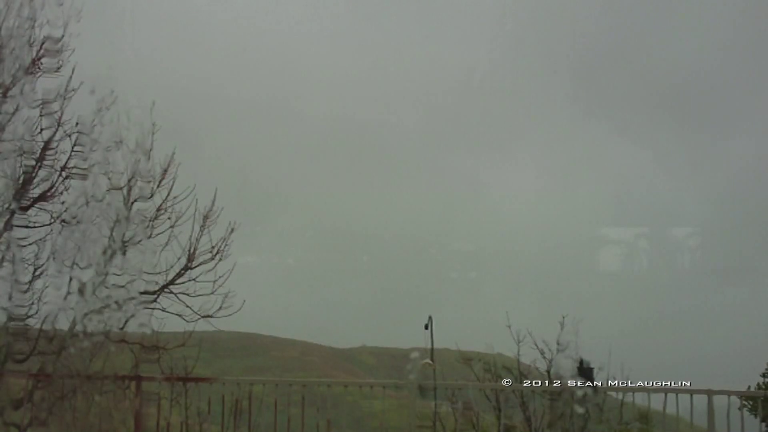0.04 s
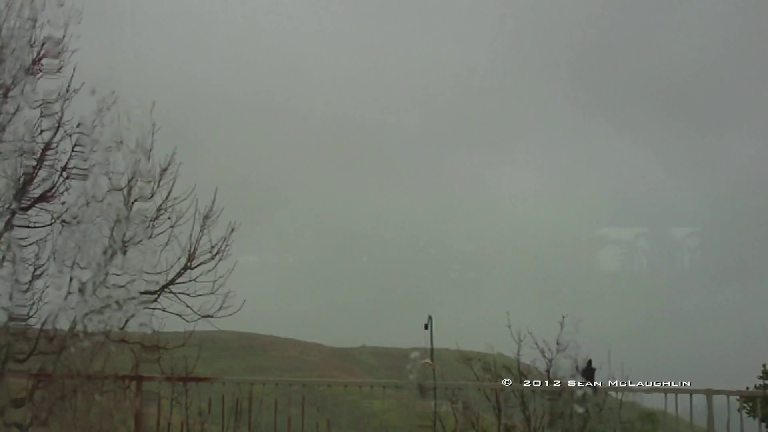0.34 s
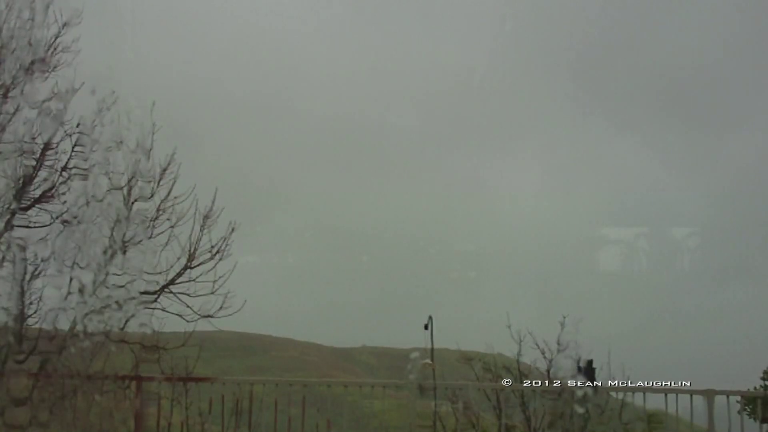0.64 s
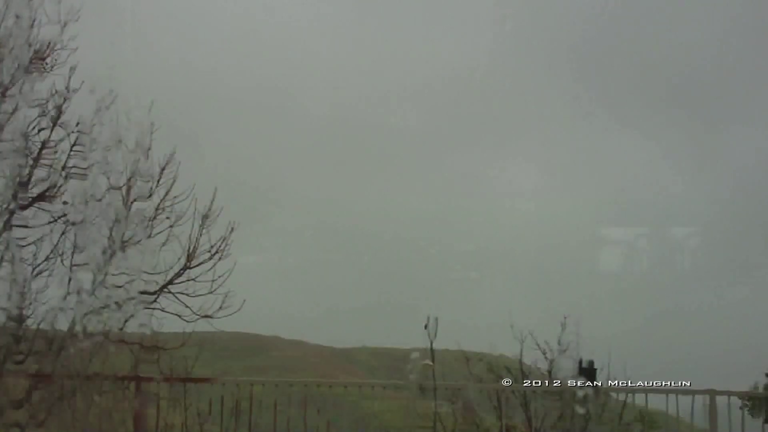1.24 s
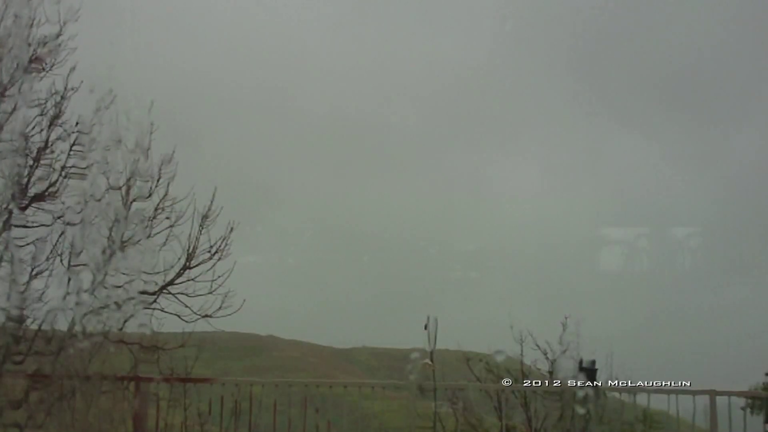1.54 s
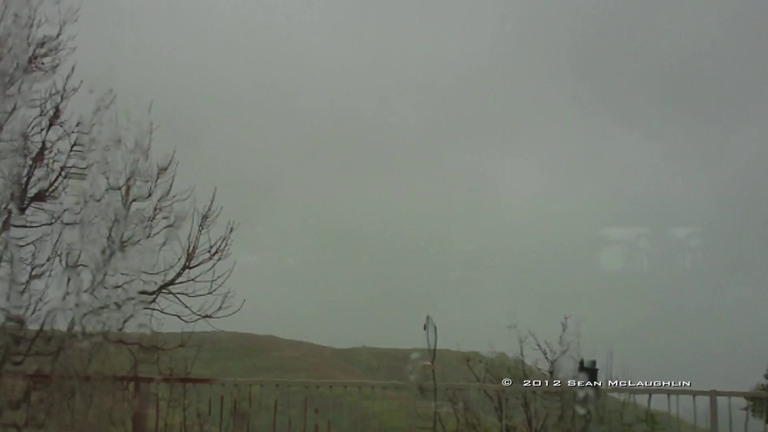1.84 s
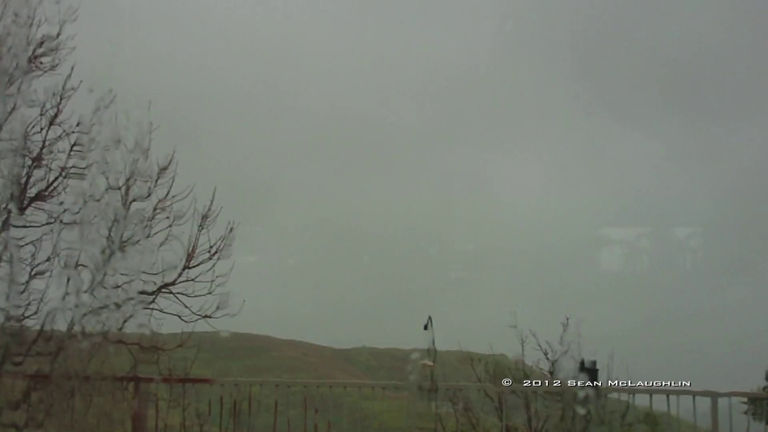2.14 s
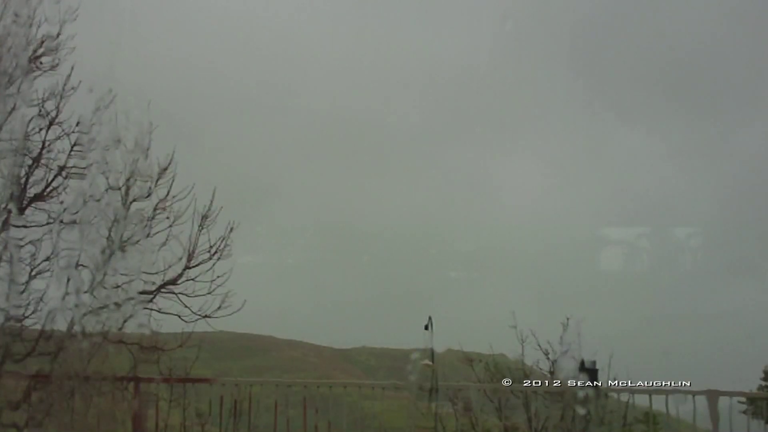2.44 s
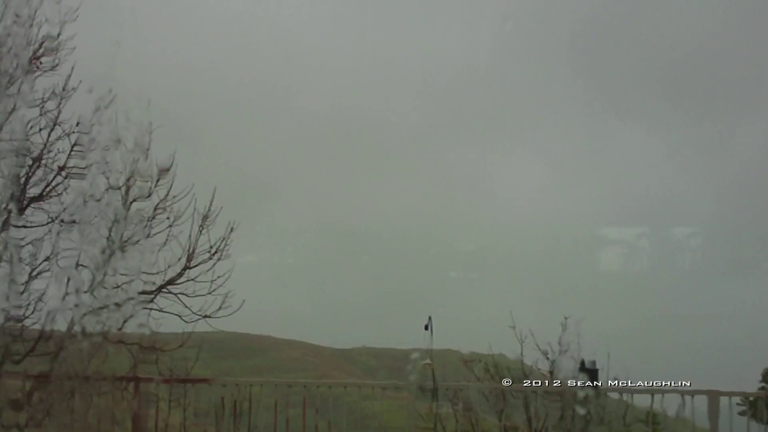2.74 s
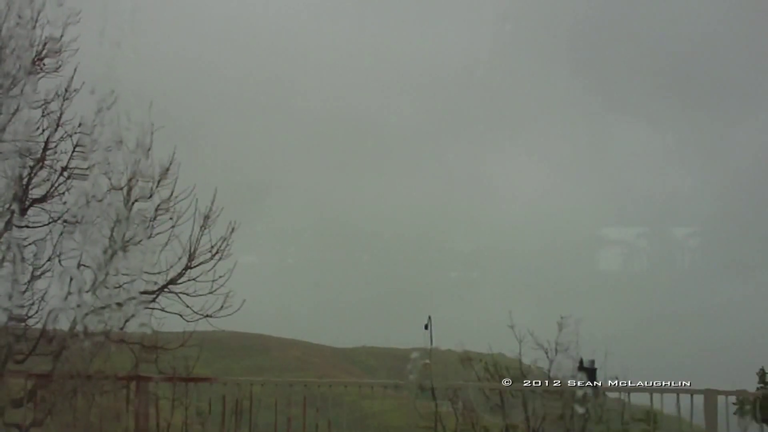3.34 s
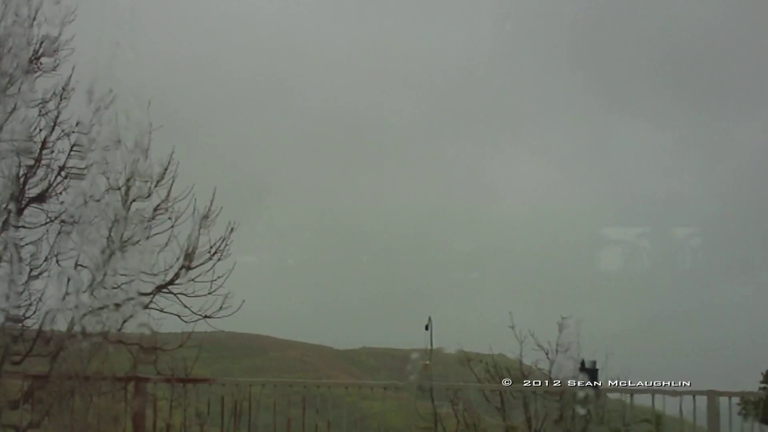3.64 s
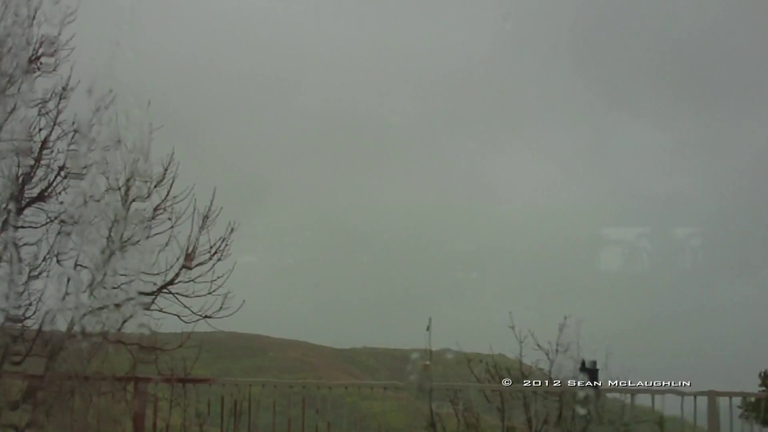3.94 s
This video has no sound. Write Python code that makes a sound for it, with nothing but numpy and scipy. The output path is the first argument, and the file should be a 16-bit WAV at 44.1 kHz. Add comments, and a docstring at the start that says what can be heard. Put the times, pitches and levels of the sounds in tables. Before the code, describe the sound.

Thunder, heard from behind a window, mutters far off for two seconds, with a dull thump at about 0.3 seconds over faint hiss. At 2 seconds a much louder peal breaks in, cracking and tearing, and booms on until the end at 4 seconds. Its surges overload the microphone with short crackles. The window rattles lightly from about 2.4 seconds and squeaks faintly around 3.4 seconds.

```python
"""Thunder, heard from behind a window: shock waves from along the lightning channel, dulled by the air.
A far roll with one dull thump mutters for two seconds, then the main peal breaks in, cracking and
tearing. Its steepest pressure fronts overload the microphone with short crackles, and the window
rattles and squeaks after the heaviest surges. Underneath lie the recorder's faint hiss and thin
whine, and early on a slight rustle and a faint whistle."""
import sys
import numpy as np
from scipy import signal
from scipy.fft import rfft, irfft
from scipy.io import wavfile
from scipy.ndimage import uniform_filter1d

SR = 44100
rng = np.random.default_rng(int(sys.argv[2]) if len(sys.argv) > 2 else 0)


def generate_wav(signal):
    """Clip the signal to [-1, 1] and save it as 16-bit WAV at the path in sys.argv[1]."""
    frames = np.transpose(np.atleast_2d(signal))
    scaled = np.clip(frames, -1, 1) * 32767
    pcm = np.round(scaled).astype(np.int16)
    wavfile.write(sys.argv[1], SR, pcm)


N = 176400
T = np.arange(N) / SR
HZ = np.maximum(np.fft.rfftfreq(N, 1 / SR), 1)

# spectrum of the near thunder: frequency_hz, gain_db
NEAR_COLOUR = [(20, -20), (30, 12.5), (39, -23), (51, 11.5), (68, -12.5), (82, 3), (97, -4), (128, 1),
               (174, -8.5), (206, -4.5), (269, -12), (345, -7), (415, -9.5), (510, -17), (820, -25.5),
               (967, -25), (1190, -33), (2500, -55)]
# steep pressure fronts that overload the microphone: start_s, crackle_db
FRONTS = [(2.0217, -41.5), (2.0405, -35.5), (2.062, -46), (2.077, -34.5), (2.0997, -32), (2.133, -34.5),
          (2.1817, -33.5), (2.2022, -38), (2.21, -40), (2.219, -34.5), (2.289, -36.5), (2.3153, -34.5),
          (2.37, -31.5), (2.405, -33.5), (2.448, -32.5), (2.6558, -32), (2.715, -33.5), (2.742, -35),
          (2.7945, -33), (2.9055, -34), (2.9261, -35), (2.9393, -34.5), (2.957, -36), (2.9685, -32.5),
          (2.9938, -34.5), (3.0096, -34.5), (3.0792, -35), (3.1228, -33), (3.161, -35), (3.1984, -36),
          (3.231, -41), (3.2517, -36), (3.3054, -36.5), (3.3225, -34.5), (3.341, -43.5), (3.4192, -38),
          (3.514, -42.5), (3.537, -33), (3.587, -36), (3.677, -35.5), (3.7073, -33.5), (3.7425, -39.5)]
FRONT_DELAY_S = 0.0018   # from the start of a crackle to the middle of its pressure swing


def from_db(db):
    """Decibels to gain."""
    return 10 ** (np.asarray(db) / 20)


def rms_one(x):
    """Scale to rms 1."""
    return x / np.sqrt(np.mean(x ** 2) + 1e-20)


def level(*curves):
    """Gain over time from (time_s, level_db) curves that follow one another."""
    s, db = np.vstack(curves).T
    return from_db(np.interp(T, s, db))


def colour(points):
    """Gain over frequency from (frequency_hz, gain_db) points."""
    hz, db = np.transpose(points)
    return from_db(np.interp(np.log(HZ), np.log(hz), db))


def tint(x, points):
    """Colour a steady noise, falling away under the first point; rms 1."""
    return rms_one(irfft(rfft(x) * colour(points) / np.sqrt(1 + (points[0][0] / HZ) ** 8), N))


def grains(per_s, spread_db):
    """Random clicks of uneven size and sign; rms 1."""
    sizes = from_db(spread_db * np.minimum(rng.exponential(1, N), 4)) * rng.choice([-1, 1], N)
    return rms_one(sizes * (rng.random(N) < per_s / SR))


def flicker(span_s):
    """A random drift that changes over the given span; rms 1."""
    return rms_one(uniform_filter1d(rng.standard_normal(N), max(int(span_s * SR), 2)))


def wavering(hz, waver_hz, span_s):
    """A tone of unsteady pitch."""
    return np.sin(2 * np.pi * np.cumsum(hz + waver_hz * flicker(span_s)) / SR)


def ring(x, hz, t60):
    """A decaying resonance driven by x."""
    r, w = from_db(-60 / (t60 * SR)), 2 * np.pi * hz / SR
    return signal.lfilter([0, np.sin(w)], [1, -2 * r * np.cos(w), r * r], x + 1e-18)


def swell(start_s, rise_s):
    """A rounded pulse that peaks one rise time after its start."""
    u = np.clip((T - start_s) / rise_s, 0, 20)
    return u ** 2 * np.exp(2 - 2 * u)


def bouts(rows, rise_s=0.0032):
    """Envelope of quick rises and slower decays from (start_s, level_db, decay_s) rows."""
    return sum(from_db(db) * np.clip((T - s) / rise_s, 0, 1) * np.exp(-np.maximum(T - s, 0) / decay)
               for s, db, decay in rows)


def arrivals(spectrum, low_hz, high_hz, per_s, spread_db, even_s):
    """One band of shock waves from along the lightning channel, its level evened out over even_s."""
    band = colour(spectrum) / np.sqrt((1 + (low_hz / HZ) ** 16) * (1 + (HZ / high_hz) ** 16))
    shocks = irfft(rfft(grains(per_s, spread_db)) * band, N)
    size = max(int(even_s * SR), 2)
    power = uniform_filter1d(uniform_filter1d(shocks ** 2, size, mode="wrap"), size, mode="wrap")
    return shocks / np.sqrt(np.abs(power) + 1e-20)


def recorder_noise():
    """The recorder's own floor: separate hiss in each channel and one thin, steady whine."""
    # spectrum of the hiss: frequency_hz, gain_db
    hiss_colour = [(1900, -7), (3000, 1.5), (4500, 1.5), (8000, -1), (15000, -2)]
    hiss = from_db(-63) * tint(rng.standard_normal((2, N)), hiss_colour)
    whine = from_db(-79.5) * rms_one(np.sin(2 * np.pi * 7860 * T))
    return hiss + whine


def rustle():
    """A faint rustle of fine ticks that fades under the far roll."""
    # the rustle's course: start_s, level_db, decay_s
    course = [(0, -60.5, 0.19)]
    # its spectrum: frequency_hz, gain_db
    spectrum = [(1200, -33), (2000, 9), (2900, 5), (3800, -10), (6000, -22)]
    return bouts(course) * tint(grains(3000, spread_db=-3.0), spectrum)


def whistle():
    """A faint, thin whistle that comes and goes, unsteady in level and pitch."""
    # the whistle's course: time_s, level_db, pitch_hz
    course = [(.38, -78, 3565), (.52, -77, 3640), (.69, -69, 3710), (.84, -73, 3610), (.95, -68, 3550),
              (1.22, -80, 3510)]
    s, db, hz = np.transpose(course)
    strength = np.interp(T, s, from_db(db), left=0, right=0) * from_db(3 * flicker(span_s=0.013))
    return strength * wavering(np.interp(T, s, hz), waver_hz=125, span_s=0.0013)


def frame_knock():
    """A quick run of light contacts makes the window frame ring."""
    # the knock: start_s, level_db, decay_s
    knocks = [(1.495, -51, 0.023)]
    # resonances of the frame: pitch_hz, gain_db, t60_s
    modes = [(2200, 1, .02), (2600, 0, 0.023), (2980, -4, .025), (3450, -9, 0.011)]
    contacts = bouts(knocks) * grains(2500, spread_db=1)
    return sum(from_db(db) * ring(contacts, hz, t60) / np.sqrt(t60 * SR / np.log(1000))
               for hz, db, t60 in modes)


def pane_squeaks():
    """The pane gives brief, high squeaks as it slips in its frame."""
    # slips of the pane: start_s, level_db, rise_s
    slips = [(3.302, -54, .013), (3.418, -46.5, 0.0026), (3.974, -55, 0.0082)]
    # partials of a squeak: pitch_hz, gain_db
    partials = [(5510, 5), (6250, -12)]
    tone = sum(from_db(db) * wavering(hz, waver_hz=230, span_s=0.00057) for hz, db in partials)
    return rms_one(tone) * sum(from_db(db) * swell(s, rise) for s, db, rise in slips)


def window_rattle():
    """Dense small contacts set the window ringing after the heavy surges."""
    # bouts of rattling: start_s, level_db, decay_s
    rattles = [(2.372, -43, 0.1), (2.468, -47, 0.036), (2.57, -52, 0.071), (3.03, -49.5, 0.16),
               (3.3, -43, 0.078), (3.445, -59.5, 0.079), (3.975, -54, 0.036)]
    # resonances of the window: pitch_hz, gain_db, t60_s
    modes = [(2390, 8, 0.0069), (3170, 6.5, 0.011), (3500, 7.5, 0.0065), (3800, -0.5, .02),
             (5160, -1, 0.0068), (5550, -6, 0.011), (5630, -5, .005), (6370, -0.5, 0.015), (6900, -5, .008)]
    ringing = sum(from_db(db) * rms_one(ring(grains(1300, spread_db=3.0), hz, t60))
                  for hz, db, t60 in modes)
    return bouts(rattles) * rms_one(ringing)


def microphone_overload():
    """Each front is a sudden swing of pressure; each channel crackles and recovers in its own way."""
    # spectrum of the crackle: frequency_hz, gain_db
    crackle_colour = [(1000, 15), (3000, 5), (5500, 5), (8000, 3), (11000, -2), (16000, -2.5)]
    # spectrum of the imbalance between left and right: frequency_hz, gain_db
    imbalance_colour = [(25, 5.5), (130, -1), (400, -8), (1000, -20), (3000, -26), (9000, -46)]
    swing_rise_s, swing_width_s, sputter_reach_s = 0.00069, 0.002, 0.015
    swings, crackle_gain, sputter_gain, imbalance_gain = np.zeros((4, N))
    for s, db in FRONTS:
        t = T - s - FRONT_DELAY_S
        swing = np.tanh(t / swing_rise_s) * np.exp(-np.minimum(abs(t) / swing_width_s, 20))
        swings += rng.choice([-1, 1]) * from_db(db + 24.5) * swing
        crackle_gain += from_db(db) * swell(s, rise_s=0.0013)
        sputter_gain += from_db(db - 19.5) * np.exp(-np.minimum((t / sputter_reach_s) ** 2, 20))
        imbalance_gain += from_db(db - 2) * swell(s, rise_s=0.0084)
    crackle = crackle_gain * tint(rng.standard_normal((2, N)), crackle_colour)
    sputter = sputter_gain * tint([grains(1500, spread_db=9.5) for _ in range(2)], crackle_colour)
    imbalance = imbalance_gain * tint(rng.standard_normal(N), imbalance_colour) * [[1], [-1]]
    return swings + crackle + sputter + imbalance


def microphone_choke():
    """Gain of the overloaded microphone, which goes briefly quieter after each front."""
    return from_db(-3 * sum(swell(s + FRONT_DELAY_S, rise_s=0.0093) for s, _ in FRONTS))


def far_thump():
    """One distant clap that arrives as a short, nearly pure boom."""
    start_s, pitch_hz = 0.249, 141
    return from_db(-14.5) * swell(start_s, rise_s=0.02) * np.sin(2 * np.pi * pitch_hz * (T - start_s))


def claps():
    """Bunches of shock waves that arrive together, each around its own pitch."""
    # claps that stand out of the roll: start_s, level_db, pitch_hz, rise_s
    bunches = [(.352, -21.5, 135, 0.039), (1.089, -29.5, 351, 0.033), (1.255, -25.5, 293, 0.014),
               (1.464, -22, 243, 0.035), (2.004, -11, 90, 0.039), (2.63, -21, 74, 0.018),
               (2.921, -14.5, 392, 0.015), (3.28, -26, 367, 0.055), (3.503, -12, 133, 0.022),
               (3.943, -18.5, 169, 0.037)]
    band_ratio = 1.46
    return sum(from_db(db) * swell(s, rise)
               * arrivals(NEAR_COLOUR, hz / band_ratio, hz * band_ratio,
                          per_s=2800, spread_db=3.5, even_s=0.068)
               for s, db, hz, rise in bunches)


def cracks():
    """Dense volleys of sharp shocks that start at once and die quickly."""
    # cracks within the main peal: start_s, level_db
    volleys = [(2.054, -24), (2.264, -32), (2.295, -26), (2.336, -25.5), (2.36, -24.5), (2.383, -34),
               (2.694, -29), (2.79, -35), (2.932, -24), (3.068, -25)]
    # their spectrum: frequency_hz, gain_db
    spectrum = [(600, 7), (950, -5), (1400, -17), (2400, -26), (9000, -38)]
    decay_s = 0.021
    envelope = bouts([(s, db, decay_s) for s, db in volleys], rise_s=0.0024)
    return envelope * arrivals(spectrum, 380, 10300, per_s=4400, spread_db=1.5, even_s=0.008)


def thunder():
    """Streams of shock waves: the far roll gives way to the near peal, each band swelling on its own."""
    # swells of the deepest rumble: time_s, level_db
    rumble_curve = [(0, -52.5), (.4, -41.5), (1.15, -48), (1.3, -37.5), (1.98, -37.5), (2.03, -23),
                    (2.35, -19), (2.56, -31), (2.66, -20.5), (2.85, -25.5), (3.15, -21.5), (4, -35)]
    # swells of the boom, far and near: time_s, level_db
    boom_far = [(0, -42), (.09, -29), (.15, -37), (.34, -27), (.4, -22.5), (.64, -34), (.95, -39),
                (1.01, -29.5), (1.2, -37.5), (1.99, -36.5)]
    boom_near = [(2.03, -21.5), (2.2, -15.5), (2.45, -26.5), (2.58, -18), (2.62, -40), (2.66, -25.5),
                 (2.77, -18.5), (2.85, -31.5), (2.92, -25.5), (3.08, -16), (3.22, -23.5), (3.37, -15.5),
                 (3.47, -21), (3.55, -18.5), (3.73, -18), (3.87, -23.5), (4, -19)]
    # swells of the rolling middle, far and near: time_s, level_db
    roll_far = [(0, -37), (.21, -40), (.33, -33), (.41, -25), (.55, -31.5), (.72, -31.5), (.87, -41.5),
                (.98, -32), (1.2, -35), (1.39, -37), (1.45, -29), (1.69, -37.5), (1.78, -31), (1.99, -40.5)]
    roll_near = [(2.03, -26), (2.09, -23.5), (2.24, -33), (2.29, -19), (2.45, -23), (2.66, -30.5),
                 (2.71, -25), (2.87, -28.5), (3.07, -25.5), (3.2, -26), (3.47, -30), (3.7, -25), (4, -33)]
    # swells of the rough upper edge, far and near: time_s, level_db
    edge_far = [(0, -47), (.33, -48.5), (.38, -37.5), (.6, -43), (1.4, -47), (1.54, -43.5), (1.68, -48),
                (2, -48)]
    edge_near = [(2.03, -39.5), (2.24, -41), (2.28, -32.5), (2.48, -35.5), (2.66, -42.5), (2.72, -31),
                 (2.86, -43.5), (3, -37), (3.3, -37.5), (3.55, -43), (4, -43.5)]
    # swells of the peal's tearing treble: time_s, level_db
    tear_curve = [(2.0, -58), (2.04, -49.5), (2.22, -54), (2.3, -36.5), (2.4, -43), (2.49, -43),
                  (2.66, -59), (2.72, -42.5), (2.78, -47), (2.87, -55.5), (2.95, -46), (3.01, -45.5),
                  (3.06, -43.5), (3.12, -41.5), (3.19, -60), (3.24, -41), (3.32, -48), (3.5, -55),
                  (3.6, -50.5), (3.66, -58), (3.75, -51), (3.9, -61)]
    # spectra of the far roll and of the tearing treble: frequency_hz, gain_db
    far_colour = [(80, -8.5), (112, 5), (205, -3.5), (263, -6.5), (336, -4), (400, -9.5), (500, -9),
                  (640, -17.5), (1200, -29.5), (1900, -42.5), (2600, -50), (4500, -61.5)]
    tear_colour = [(1200, 5), (1650, 2.5), (2400, -4), (3400, -8.5), (4300, -15.5), (7000, -24),
                   (10000, -28.5), (16000, -31)]
    boom, roll, edge = level(boom_far, boom_near), level(roll_far, roll_near), level(edge_far, edge_near)
    far = (boom * arrivals(far_colour, 80, 196, per_s=1700, spread_db=5.5, even_s=0.03)
           + roll * arrivals(far_colour, 188, 592, per_s=1800, spread_db=2.5, even_s=0.063)
           + edge * arrivals(far_colour, 647, 4500, per_s=5000, spread_db=1, even_s=0.069))
    peal = (boom * arrivals(NEAR_COLOUR, 62, 189.4, per_s=740, spread_db=1.5, even_s=0.043)
            + roll * arrivals(NEAR_COLOUR, 192, 713, per_s=980, spread_db=3, even_s=0.052)
            + edge * arrivals(NEAR_COLOUR, 600, 2180, per_s=1800, spread_db=3.5, even_s=0.13))
    rumble = arrivals(NEAR_COLOUR, 16, 110, per_s=1000, spread_db=13.5, even_s=0.041)
    tear = arrivals(tear_colour, 1120, 16000, per_s=9000, spread_db=4.0, even_s=0.082)
    peal_start_s, crossfade_s = 2, 0.03
    near = np.clip((T - peal_start_s) / crossfade_s, 0, 1)
    return level(rumble_curve) * rumble + (1 - near) * far + near * (peal + level(tear_curve) * tear)


def scene():
    """The storm and the window as the stereo microphone takes them in, choking after each front."""
    storm = thunder() + far_thump() + claps() + cracks()
    window = window_rattle() + frame_knock() + pane_squeaks()
    picked_up = microphone_choke() * (storm + window) + microphone_overload()
    return picked_up + recorder_noise() + rustle() + whistle()


def record(dry):
    """The top is cut steeply above 15.5 kHz."""
    return signal.sosfiltfilt(signal.butter(16, 15500, fs=SR, output="sos"), dry)


dry = scene()
out = record(dry)
generate_wav(out)
```